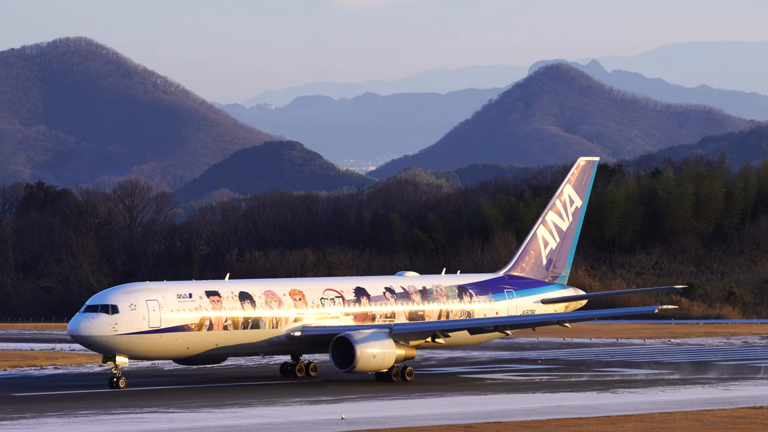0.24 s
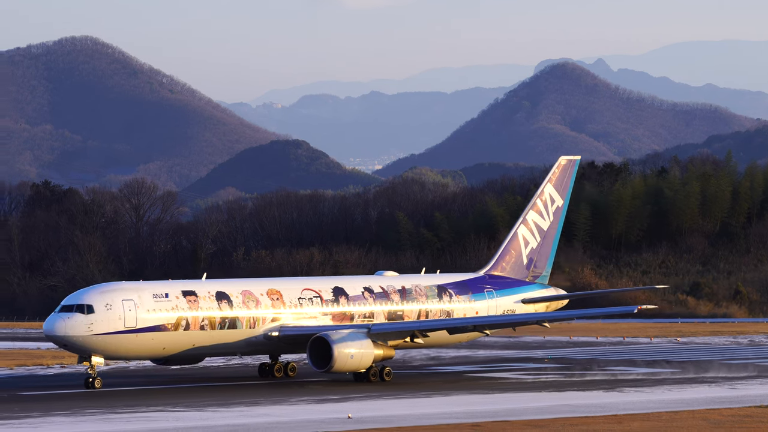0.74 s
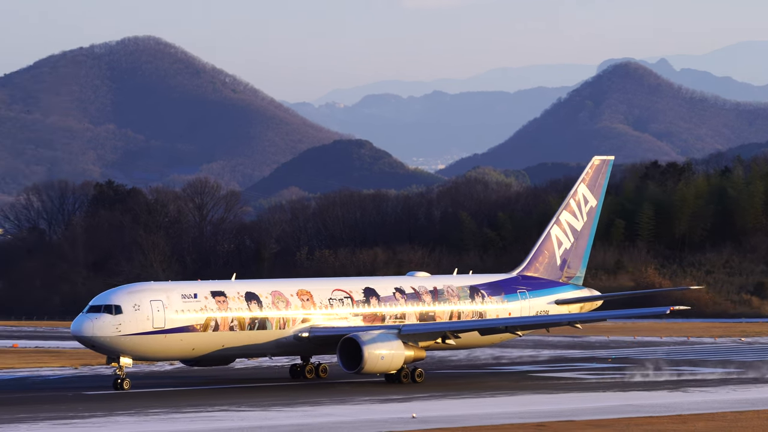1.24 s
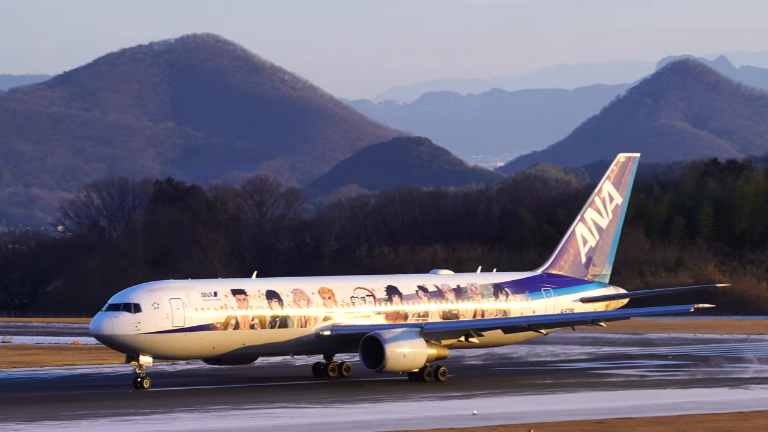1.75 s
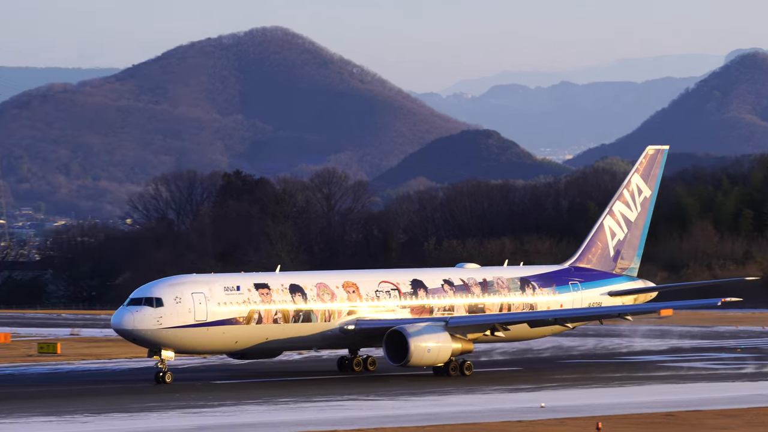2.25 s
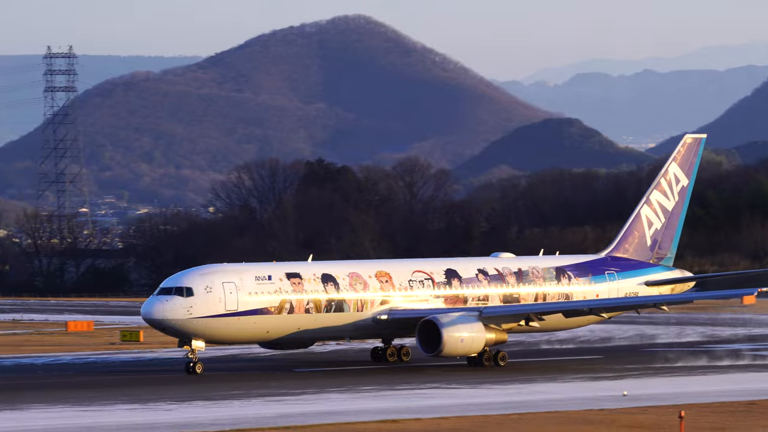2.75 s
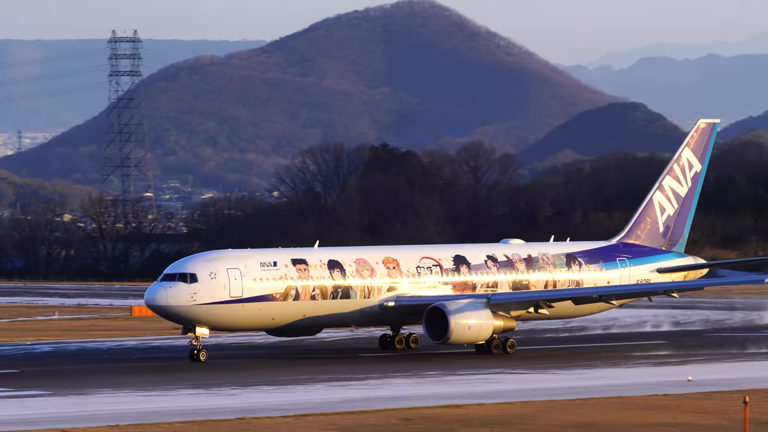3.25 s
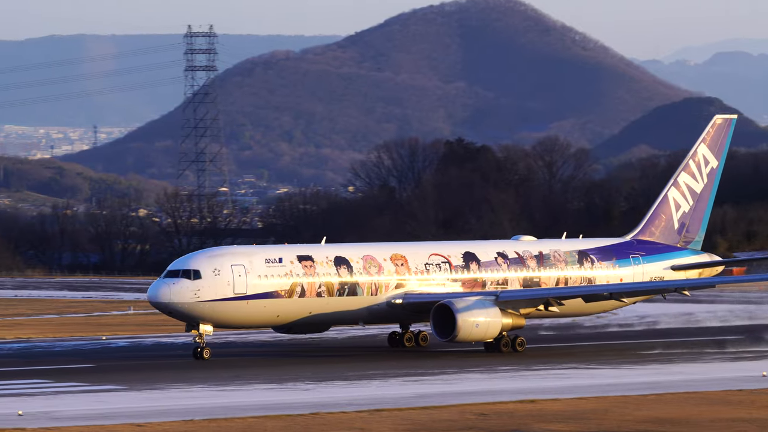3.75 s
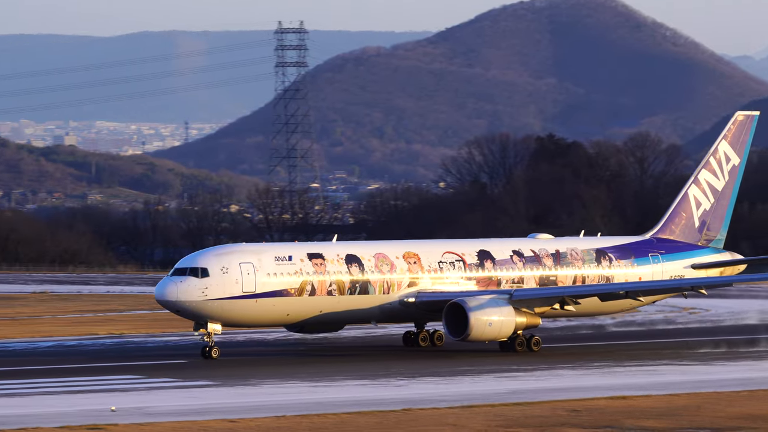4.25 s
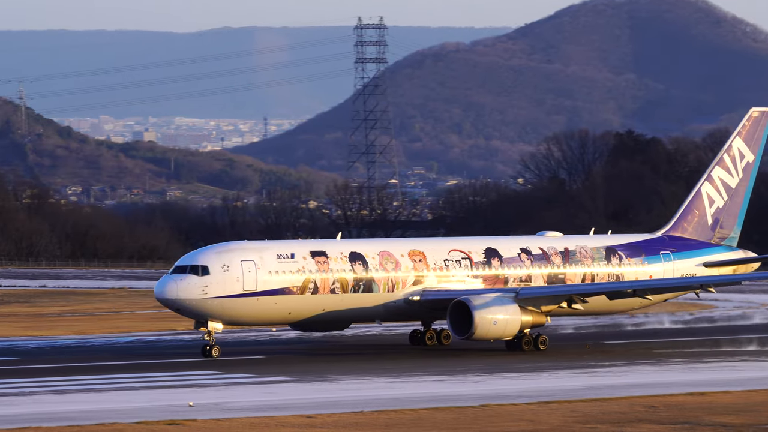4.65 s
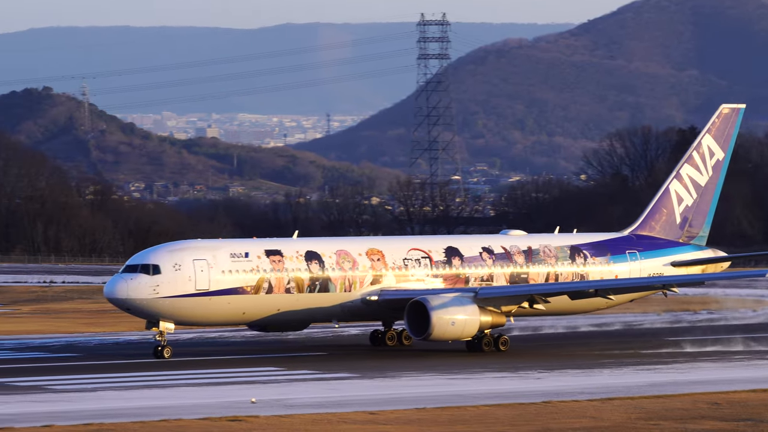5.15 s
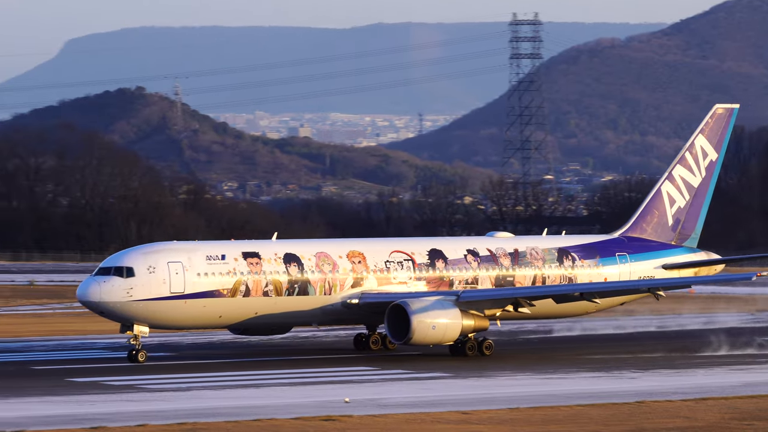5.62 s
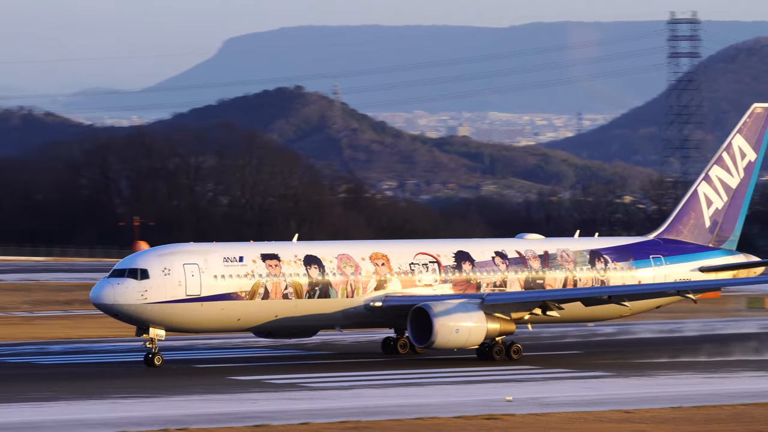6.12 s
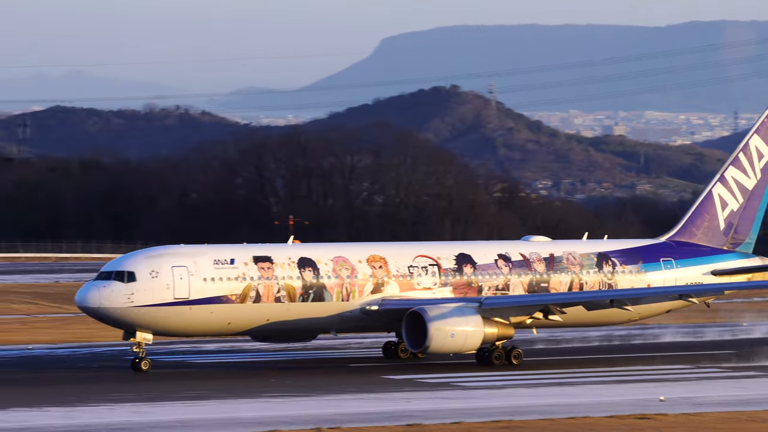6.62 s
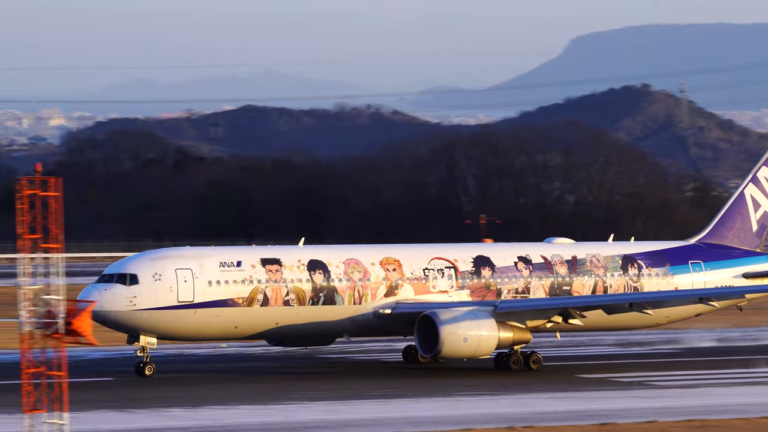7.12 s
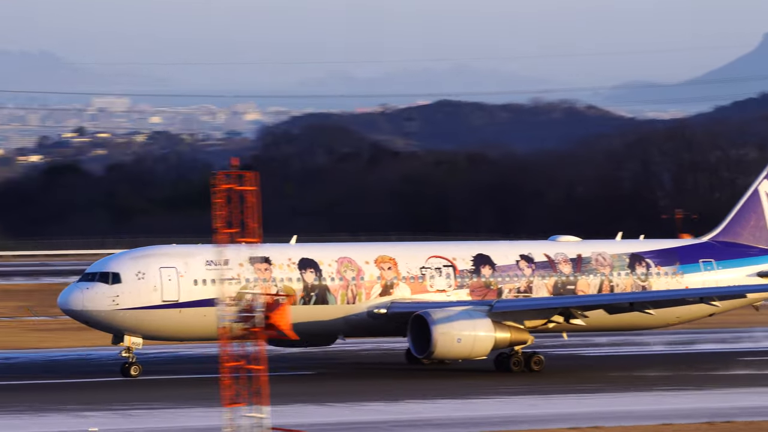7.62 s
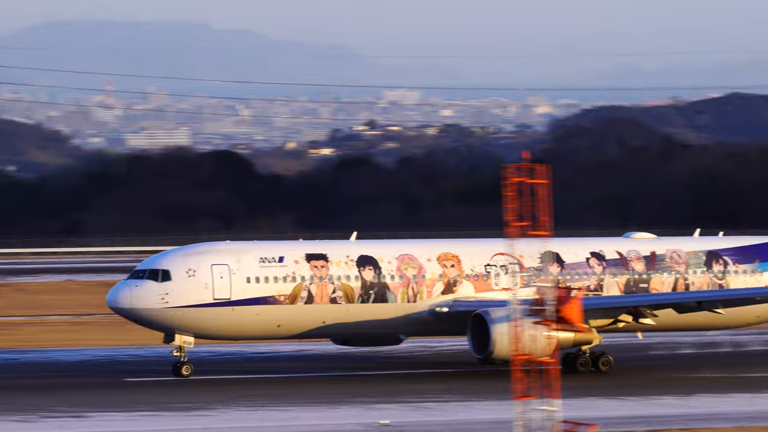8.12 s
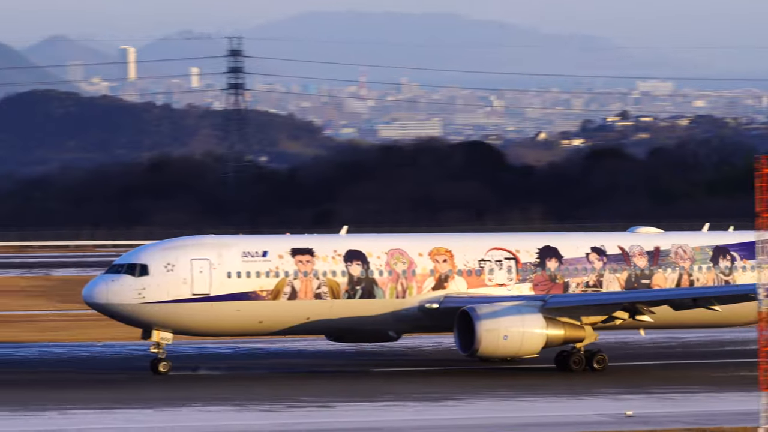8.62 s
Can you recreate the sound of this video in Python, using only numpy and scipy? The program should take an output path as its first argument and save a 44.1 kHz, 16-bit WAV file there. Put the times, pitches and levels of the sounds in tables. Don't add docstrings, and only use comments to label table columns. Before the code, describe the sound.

Heard from beside an airfield, a far-off airliner gives a steady high whine, two close tones beating and fluttering in moving air over soft jet hiss. After about three seconds the whine brightens and climbs quickly. The exhaust roar then grows, with low rumble, and buries the fading whine. Distant outdoor microphone, no close detail.

```python
import sys
import numpy as np
from scipy import signal
from scipy.fft import rfft, irfft, next_fast_len
from scipy.io import wavfile
from scipy.ndimage import uniform_filter1d, map_coordinates

SR = 44100
rng = np.random.default_rng(int(sys.argv[2]) if len(sys.argv) > 2 else 0)


def decibels_to_gain(level_db):
    exponent = np.asarray(level_db, float) / 20
    return 10 ** exponent


def persist_wave(psi):
    counts = np.round(np.clip(psi, -1, 1) * 32767).astype(np.int16)
    wavfile.write(sys.argv[1], SR, np.atleast_2d(counts).T)


N = 391166


def unit(x):
    return x / np.sqrt(np.mean(x ** 2) + 1e-20)


def curves(rows):
    s, *columns = np.transpose(rows)
    return [np.interp(np.arange(N) / SR, s, column) for column in columns]


def bumps(rows):
    t = np.arange(0, N, 64) / SR
    total = 0
    for start, *heights, width in rows:
        total = total + np.outer(heights, np.exp(-((t - start) / width) ** 2))
    return [np.interp(np.arange(N) / SR, t, column) for column in total]


def wobble(rate):
    coarse = np.arange(0, N + 32, 32)
    knots = rng.standard_normal(int(N * rate / SR) + 4)
    return np.interp(np.arange(N), coarse, map_coordinates(knots, [coarse * rate / SR]))


def turbulence(spectrum, patchy_db):
    z = signal.stft(rng.standard_normal(N), nperseg=512)[2]
    field = uniform_filter1d(rng.standard_normal(z.shape), size=5, axis=0)
    field = uniform_filter1d(field, size=12, axis=1)
    white = signal.istft(z * decibels_to_gain(patchy_db * unit(field)), nperseg=512)[1][:N]
    m = next_fast_len(N + 8192)
    hz, db = np.transpose(spectrum)
    log_hz = np.log(np.fft.rfftfreq(m, 1 / SR) + 1)
    gain = decibels_to_gain(np.interp(log_hz, np.log(hz), db, -120, -120))
    return unit(irfft(rfft(white, m) * gain, m)[:N])


def tone(turns, level_db, flicker):
    slow = wobble(22) + 1j * wobble(22)
    quick = wobble(160) + 1j * wobble(160)
    scatter = 1 + flicker * (slow + 1.1 * quick)
    return np.sqrt(2) * decibels_to_gain(level_db) * np.imag(scatter * np.exp(2j * np.pi * turns))


# time in seconds, level in dB.
AMPLIFIER_NOISE = [(0, -84), (3, -84), (5, -86.5), (7, -89), (8.87, -91)]
# frequency in Hz, level in dB against the noise.
ELECTRONIC_WHISTLE = (13560, -16)


def amplifier_noise():
    whistle_hz, whistle_db = ELECTRONIC_WHISTLE
    whistle = np.sqrt(2) * decibels_to_gain(whistle_db) * np.sin(2 * np.pi * whistle_hz * np.arange(N) / SR)
    return decibels_to_gain(curves(AMPLIFIER_NOISE)[0]) * (rng.standard_normal(N) + whistle)


# time in seconds, level in dB.
DRONE_LEVEL = [
    (0, -64),
    (1.2, -62),
    (1.6, -50),
    (2.6, -55),
    (3.4, -63.5),
]


def drone():
    drone_hz = 150.5
    return tone(drone_hz * np.arange(N) / SR, curves(DRONE_LEVEL)[0], flicker=0.26)


# time in seconds, level in dB, half width in seconds.
CLEAR_AIR = [
    (.12, -47.5, 0.1),
    (1.35, -56.5, 0.17),
    (3.18, -53, .05),
    (3.47, -52, 0.019),
    (3.575, -37.5, 0.022),
    (3.675, -44, .02),
    (3.79, -46, .025),
    (3.92, -55.5, .03),
    (4.07, -54, 0.028),
]


def clear_moments(wider):
    return bumps([(s, decibels_to_gain(db), wider * width) for s, db, width in CLEAR_AIR])[0]


# frequency in Hz, level in dB per Hz.
CLEAR_AIR_COLOUR = [(2500, -28), (3500, 2), (5000, -5), (6500, -22), (8000, -38.5), (10000, -52),
                    (14000, -60)]


def clearings():
    return clear_moments(0.9) * turbulence(CLEAR_AIR_COLOUR, patchy_db=-0.5)


# time in seconds, clarity in dB.
AIR_CLARITY = [(0, -4), (.25, 4), (.5, -5), (.85, 1.5), (1.2, 2.5), (1.85, -7), (2.2, -2), (2.55, 3),
               (2.97, -6.5), (3.14, 11), (3.6, 16), (3.85, 7), (4.1, 4.5), (4.3, -5), (4.8, -10),
               (5.2, -14.5), (6.5, -21.5), (8.87, -26)]


def air_clarity():
    return curves(AIR_CLARITY)[0]


# time in seconds, roar level in dB.
ROAR_LEVEL = [(0, -28), (1.1, -27.5), (1.7, -26), (2.9, -28), (3.6, -27), (4.45, -25), (5, -20.5),
              (5.6, -19), (6.2, -20), (6.7, -18.5), (7.1, -19), (7.7, -18.5), (8.2, -19.5), (8.55, -21),
              (8.87, -20)]
# time in seconds, bearing from 0 nose-on to 1 side-on.
ASPECT = [(0, 0.03), (1.5, 0.3), (3, 0.34), (4.5, 0.3), (6, 0.55), (7, 0.56), (7.6, .75), (8.2, 0.99),
          (8.87, 1)]
# frequency in Hz, level in dB per Hz.
RUMBLE_COLOUR = [(18, -20.5), (35, -10), (65, 2.5), (110, -1), (200, -8.5), (300, -7.5), (420, -30),
                 (600, -93)]
ROAR_NOSE_ON = [(200, -56), (300, -17), (400, -12), (520, -0.5), (650, -2), (900, -1.5), (1200, -4),
                (1600, -10), (2200, -61)]
ROAR_SIDE_ON = [(200, -48.5), (300, -15), (400, -8.5), (520, 1), (650, -1.5), (900, -5.5), (1200, -11),
                (1600, -22.5), (2200, -60.5)]
RUSH_NOSE_ON = [(500, -48), (900, -3.5), (1250, 1), (1700, 1.5), (2100, -2), (2600, -9), (3200, -14.5),
                (4200, -52.5)]
RUSH_SIDE_ON = [(700, -51), (1200, -11), (1550, -4), (1900, 1.5), (2200, 0), (2600, -6), (3200, -20),
                (4200, -58)]
HISS_COLOUR = [(1800, -38), (2500, -1), (3000, -1), (4000, -9.5), (5000, -20), (6000, -32), (7000, -42.5),
               (8000, -52.5), (9000, -65), (11000, -100)]


def exhaust():
    roar_db, = curves(ROAR_LEVEL)
    more_db = roar_db - roar_db[0]
    clear_db = np.maximum(air_clarity(), 0)
    abeam = np.clip(curves(ASPECT)[0], 0, 1)
    near_hz = fan_rotation()[0]
    spooled = np.clip((near_hz - near_hz[0]) / 350, 0, 1)

    def swell():
        return 0.5 * wobble(4.5)

    past_peak = np.clip(np.arange(N) / SR - 6.4, 0, 1)
    rumble_db = -43.5 + 1.09 * np.maximum.accumulate(more_db) - 1.5 * past_peak + 0.76 * swell()
    rush_db = -25 + 0.15 * more_db + 0.11 * clear_db - 5.5 * abeam + swell()
    hiss_db = -38 + 4 * spooled - 2 * abeam + 0.3 * clear_db + swell()

    nose_on, side_on = np.cos(np.pi / 2 * abeam), np.sin(np.pi / 2 * abeam)
    roar = nose_on * turbulence(ROAR_NOSE_ON, patchy_db=0.5)
    roar += side_on * turbulence(ROAR_SIDE_ON, patchy_db=0.93)
    rush = nose_on * turbulence(RUSH_NOSE_ON, patchy_db=0.17)
    rush += side_on * turbulence(RUSH_SIDE_ON, patchy_db=0.0)

    flutter = wobble(14)
    jet = decibels_to_gain(rumble_db) * turbulence(RUMBLE_COLOUR, patchy_db=-0.43)
    jet += decibels_to_gain(roar_db + 0.3 * swell()) * roar
    jet += decibels_to_gain(rush_db + 0.2 * flutter) * rush
    jet += decibels_to_gain(hiss_db + 0.13 * flutter) * turbulence(HISS_COLOUR, patchy_db=0.8)
    return jet


# time in seconds, blade passing rate in Hz.
NEAR_FAN_SPEED = [(0.0, 1520.4), (0.5, 1537.6), (1.4, 1534.3), (2.5, 1538.7), (3.0, 1553.0), (3.25, 1561.9),
                  (3.45, 1599.0), (3.65, 1656.7), (4.0, 1778.1), (4.35, 1870.8), (4.65, 1964.5),
                  (4.9, 2018.9), (5.35, 2090.6), (6.0, 2144.6), (6.5, 2166.9), (7.0, 2173.6), (7.5, 2196.5),
                  (8.87, 2207.2)]
# time in seconds, far minus near in Hz.
FAN_GAP = [(0.0, 8.99), (0.38, 9.44), (0.65, 7.77), (0.98, 10.2), (1.32, 9.42), (1.78, 9.78), (2.18, 9.48),
           (2.52, 10.72), (2.91, 2.89), (3.19, -1.18), (3.46, -11.71), (3.8, -7.25), (3.97, -20.08),
           (4.36, -20.93), (4.68, -29.93), (4.98, -13.58), (5.57, -5.32), (8.87, -4.34)]


def fan_rotation():
    near_hz, gap_hz = curves(NEAR_FAN_SPEED)[0], curves(FAN_GAP)[0]
    near = np.cumsum(near_hz) / SR
    far = near + np.cumsum(gap_hz) / SR - 0.345
    blade_count = 38
    return near_hz, near, far, near / blade_count


def drift():
    return 1.0 * wobble(7.5)


# time in seconds, level in dB.
BUZZ_LEVEL = [
    (4.3, -65.5),
    (4.65, -38),
    (4.9, -48.5),
    (5.45, -46.5),
    (5.58, -35),
    (5.72, -44),
    (6.3, -60.5),
]


def buzz():
    shaft = fan_rotation()[3]
    return tone(41 * shaft, curves(BUZZ_LEVEL)[0], flicker=0.67)


# time in seconds, change in dB, half width in seconds.
WHINE_GUSTS = [
    (.25, -10, .1),
    (1.15, 3, 0.13),
    (1.85, -12, 0.41),
    (2.35, 2.5, .12),
    (2.85, -6.5, 0.3),
    (3.3, 4.5, 0.14),
]


def compressor_whine():
    near_hz, _, _, shaft = fan_rotation()
    climb_hz = near_hz - near_hz[0]
    clear_db = np.maximum(air_clarity(), 0)
    whine_db = -48 + bumps(WHINE_GUSTS)[0] - 1.1 * np.maximum(climb_hz - 60, 0) + drift() / 2
    sum_db = -72.5 + 0.6 * clear_db - 0.2 * climb_hz
    return tone(100 * shaft, whine_db, flicker=0.14) + tone(138 * shaft, sum_db, flicker=0.4)


def overtones():
    near_hz, near, far, _ = fan_rotation()
    climb_hz = near_hz - near_hz[0]
    clarity = air_clarity()
    near_octave = -41 + clarity + drift()
    far_octave = -43 + np.minimum(clarity, 0) + 0.31 * np.maximum(clarity, 0) + drift()
    octaves = tone(2 * far, far_octave, flicker=0.38) + tone(2 * near, near_octave, flicker=0.28)

    sinking_db = 0.09 * np.maximum(climb_hz - 270, 0)
    steady = decibels_to_gain(-60 + 0.23 * clarity.clip(-8) - sinking_db + drift() / 2)
    gust = decibels_to_gain(20) * clear_moments(2.8) ** 1.56
    twelfth = 20 * np.log10(steady + gust)
    far_twelfth = twelfth + far_octave - np.maximum(near_octave, far_octave) - 3
    upper = tone(3 * near, twelfth, flicker=0.45) + tone(3 * far, far_twelfth, flicker=0.45)

    fading_db = 0.03 * climb_hz
    upper += tone(4 * near, twelfth - 24 + fading_db / 2, flicker=0.5)
    upper += tone(5 * near, 1.5 * twelfth - 14 - fading_db, flicker=0.4)
    return octaves + upper


# time in seconds, far fan level in dB, near fan level in dB.
BLADE_LEVELS = [(0, -31, -18.5), (.3, -23, -19), (.55, -26.5, -23), (1.2, -28.5, -23.5), (1.5, -20.5, -22),
                (1.85, -20.5, -21), (2.2, -23.5, -17.5), (2.7, -26, -19.4), (3, -28.5, -31),
                (3.25, -28, -15.5), (3.62, -16.5, -9), (4.1, -21, -17), (4.35, -26.5, -27.5),
                (5.2, -32, -21.5), (6, -32.5, -40.5), (6.7, -41.5, -36.5), (7.35, -46.5, -35.5),
                (8.87, -46, -36)]
# time in seconds, far fan change in dB, near fan change in dB, half width in seconds.
BLADE_GUSTS = [(0.15, 1.7, 0, 0.093), (0.49, -0.5, -7.5, 0.054), (0.61, -7.5, -4.5, 0.024),
               (0.81, 3.5, -4.5, 0.11), (1.06, 4.3, -2.5, 0.05), (1.27, -10, -4.5, 0.051),
               (1.58, -5, -4, 0.026), (2.41, 0.2, -8, 0.085), (2.67, 9.5, -3.3, 0.06),
               (2.88, 4.8, 3.5, 0.043), (3.15, 5, 6, 0.084), (3.42, 10.5, -5.5, 0.058), (3.87, -7, 4, 0.04),
               (3.91, -10, -4.5, 0.04), (4.0, -10.5, -7, 0.04), (4.09, 0.5, 3, 0.095),
               (4.24, -10.5, 8.5, 0.031), (4.5, 2.5, 4.7, 0.063), (4.62, -9, -4, 0.024),
               (4.77, -5, -1, 0.12), (4.87, -4.9, 6, 0.037), (5.01, 6.5, -9.1, 0.13),
               (5.29, -9.8, -2.5, 0.065), (5.42, -8.7, -11.5, 0.057), (5.68, -1, 2.5, 0.12),
               (6.08, -11, -8, 0.05), (6.58, -3.2, -3.5, 0.064), (6.88, -9, -9, 0.054),
               (7.36, -1.5, 8.1, 0.09), (8.52, -3.5, -11, 0.09)]


def blade_tones():
    _, near, far, _ = fan_rotation()
    far_db, near_db = np.add(curves(BLADE_LEVELS), bumps(BLADE_GUSTS))
    return tone(far, far_db, flicker=0.13) + tone(near, near_db, flicker=0.13)


def scene():
    background = drone() + clearings() + exhaust()
    engines = buzz() + compressor_whine() + overtones() + blade_tones()
    return (background + engines)[None]


def compressor(x, threshold_db, slope, lag):
    keep = np.exp(-1 / (lag * SR))
    power = signal.lfilter([(1 - keep) ** 2], [1, -2 * keep, keep ** 2], x ** 2)
    over_db = np.maximum(10 * np.log10(np.abs(power) + 1e-12) - threshold_db, 0)
    return x * decibels_to_gain(-slope * over_db)


def top_cut(x):
    return signal.sosfilt(signal.butter(12, 15720, fs=SR, output="sos"), x)


def record(dry):
    mix = compressor(dry, threshold_db=-15, slope=0.68, lag=0.0074) + amplifier_noise()
    return top_cut(mix)


dry = scene()
out = record(dry)
persist_wave(out)
```